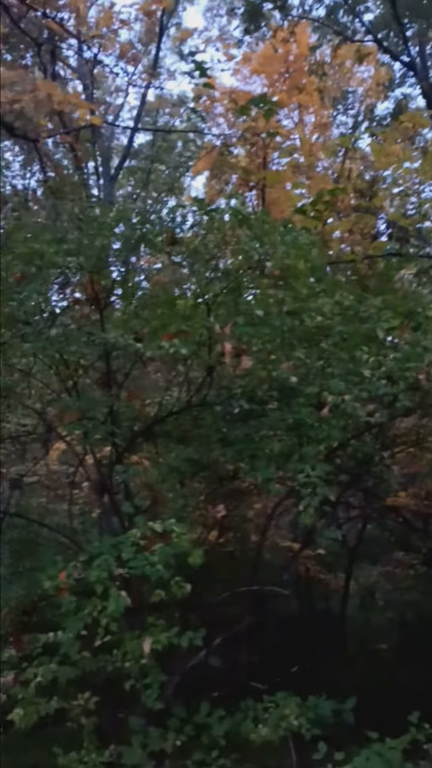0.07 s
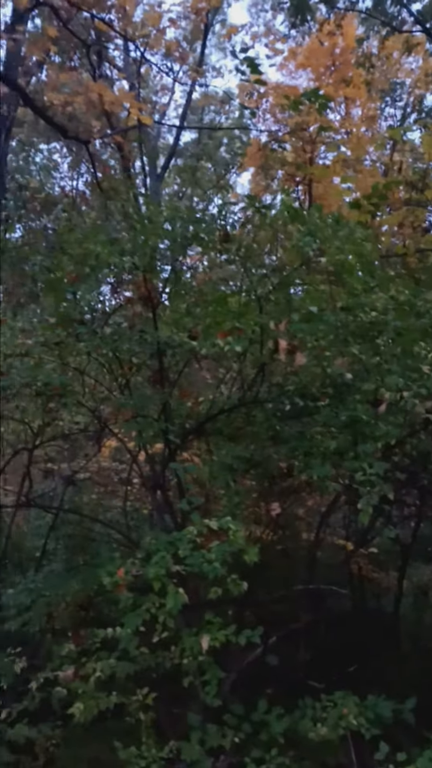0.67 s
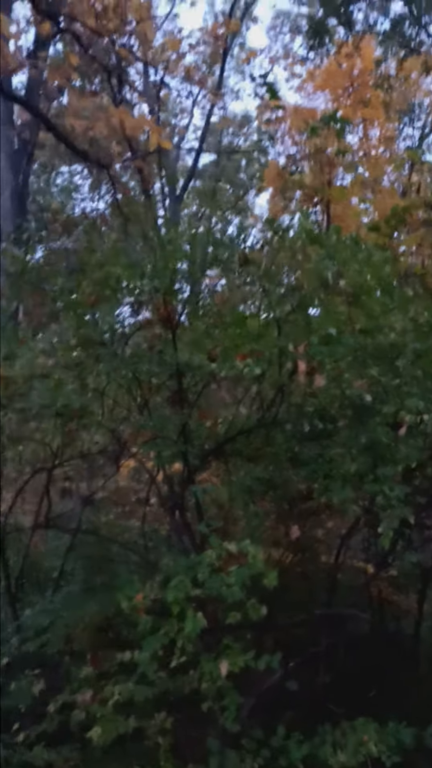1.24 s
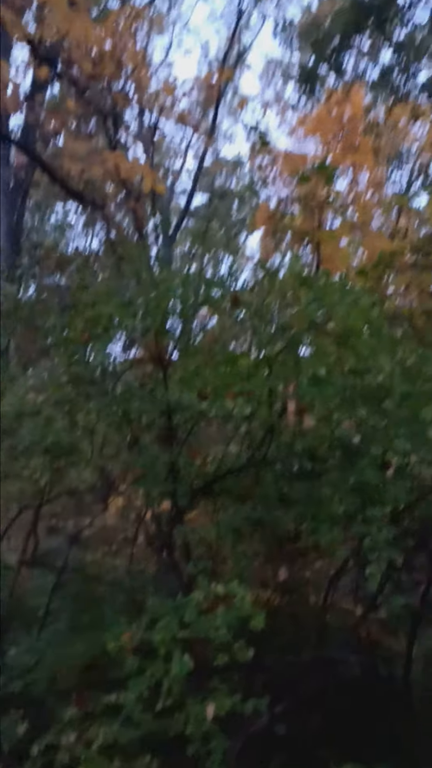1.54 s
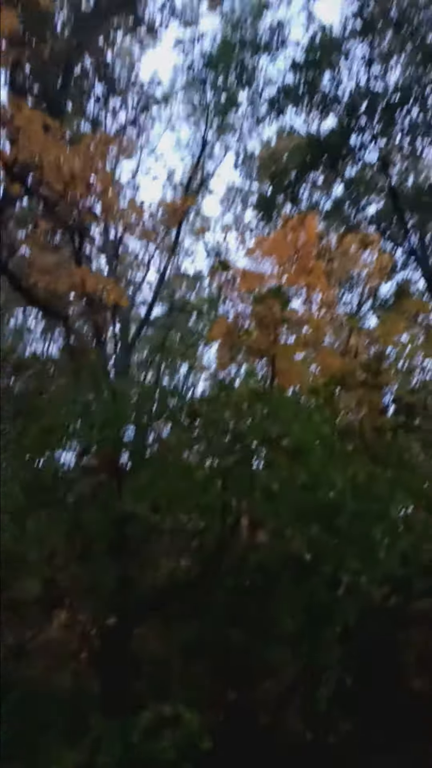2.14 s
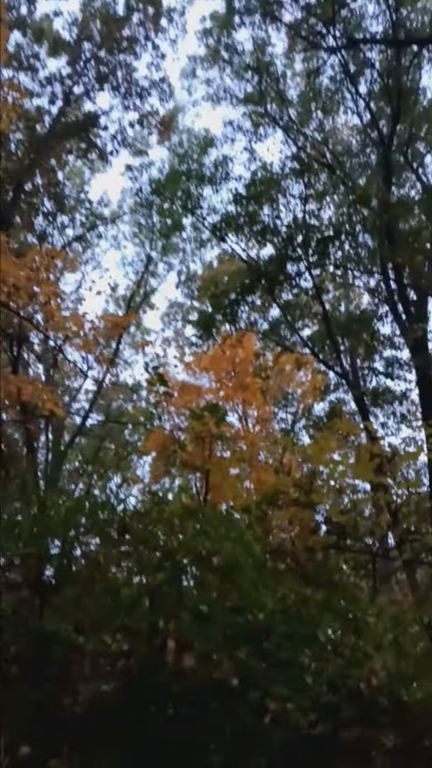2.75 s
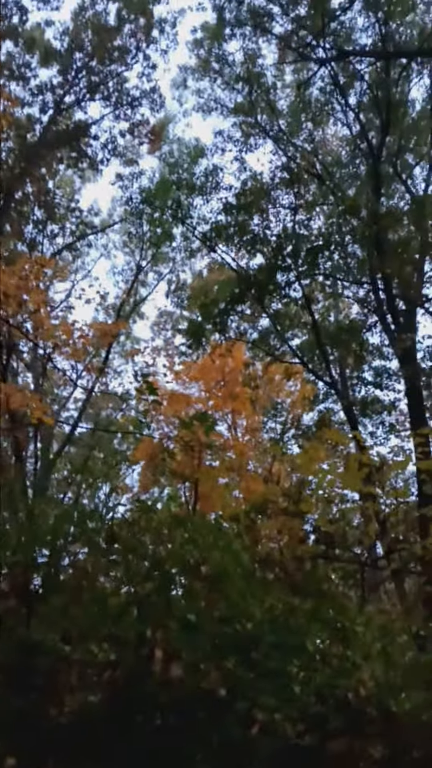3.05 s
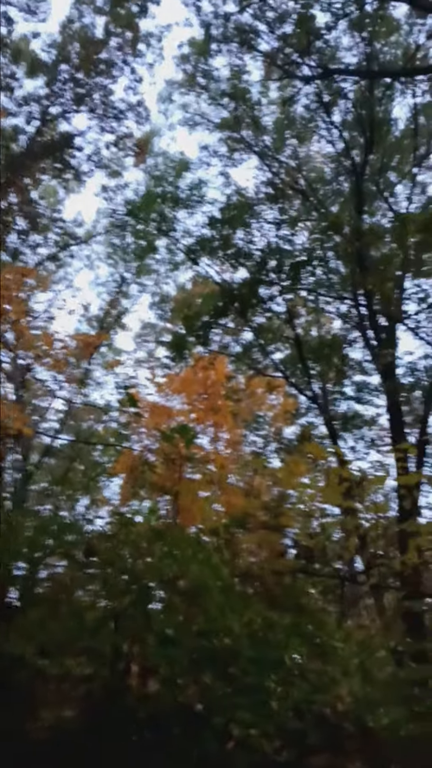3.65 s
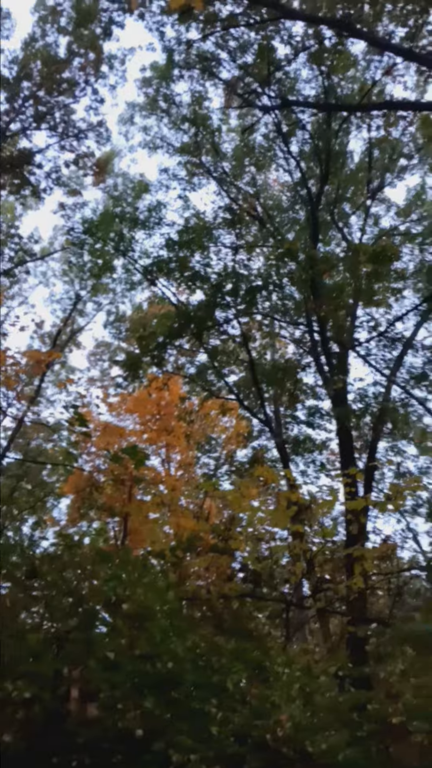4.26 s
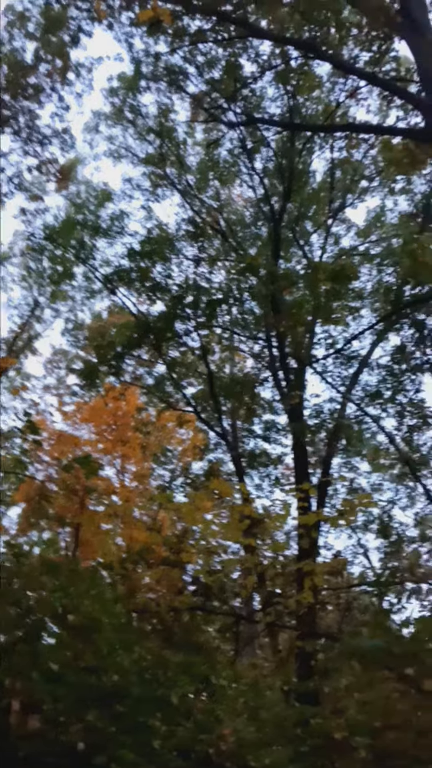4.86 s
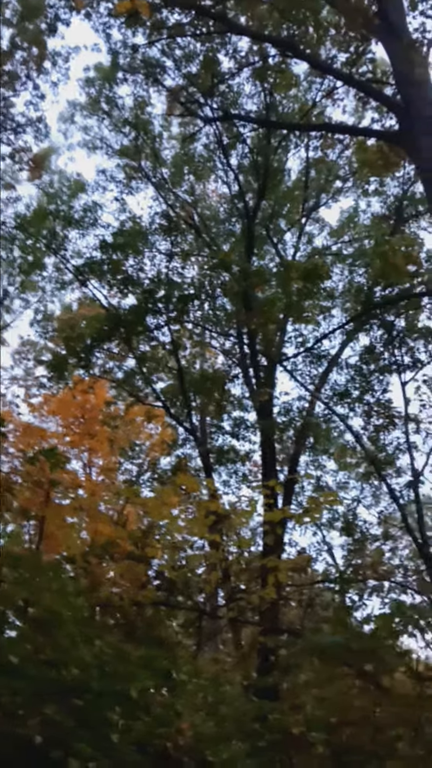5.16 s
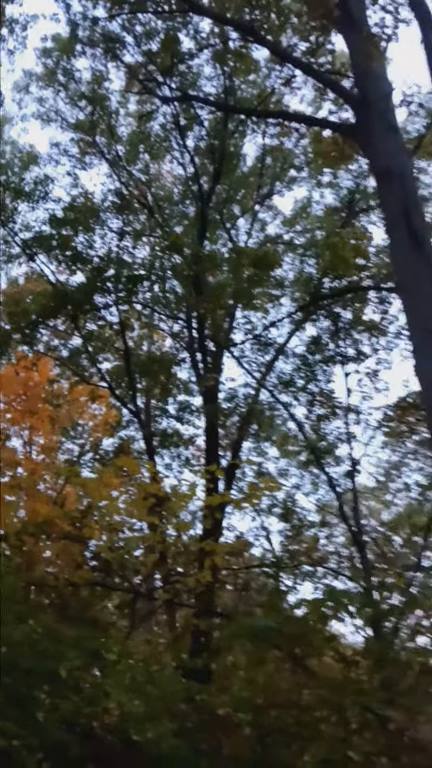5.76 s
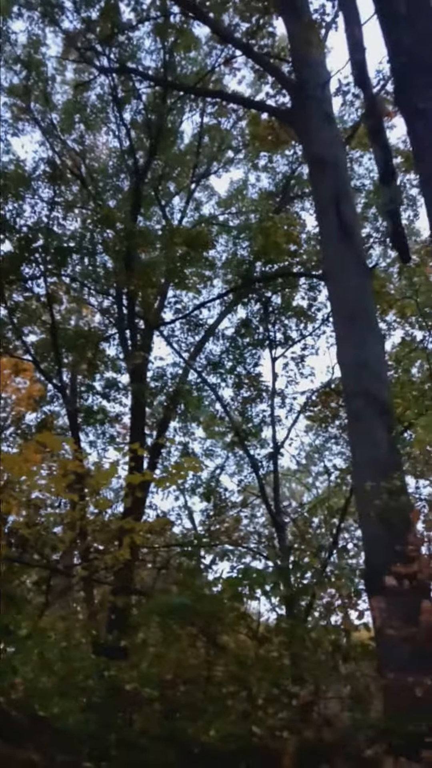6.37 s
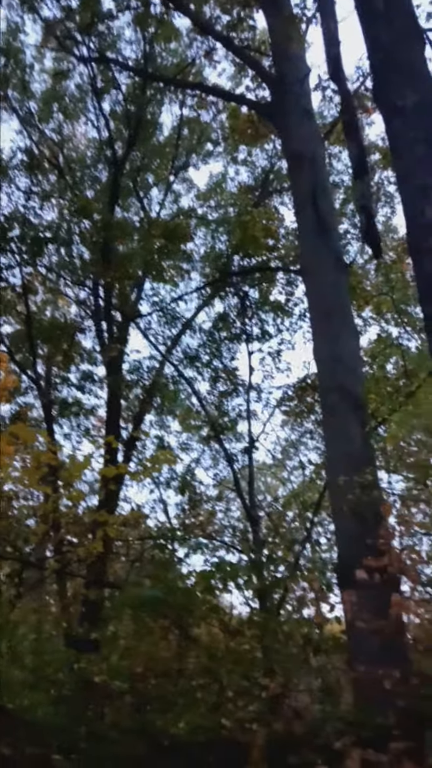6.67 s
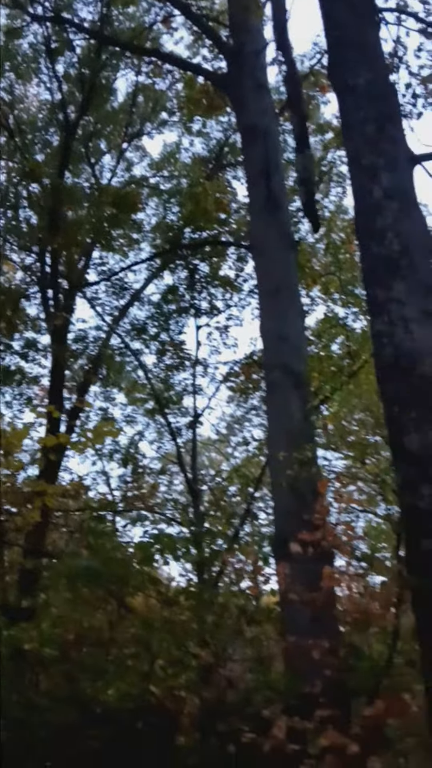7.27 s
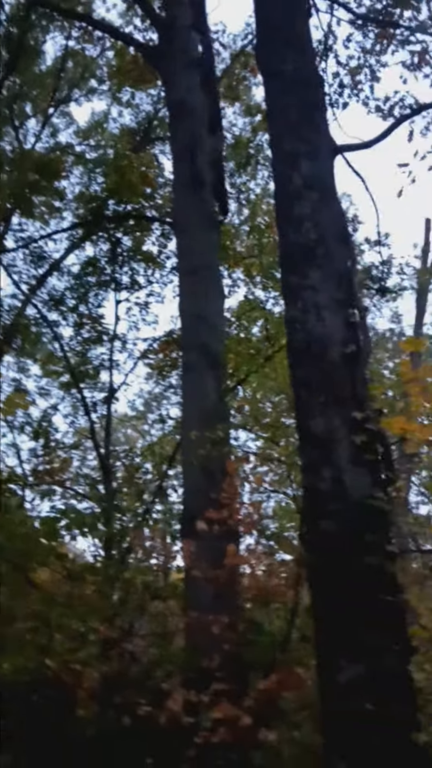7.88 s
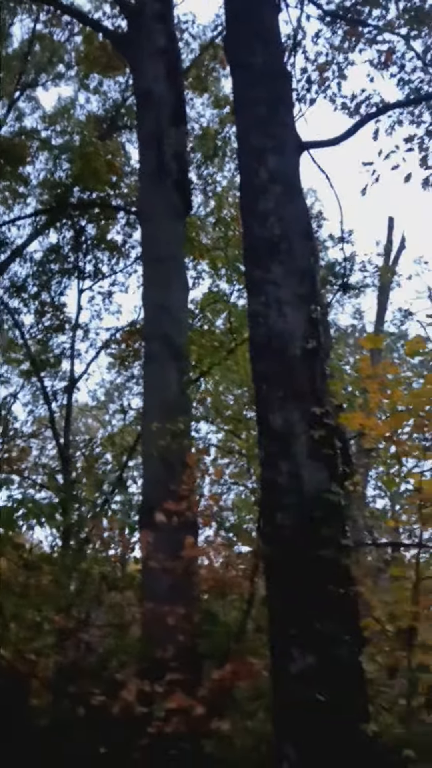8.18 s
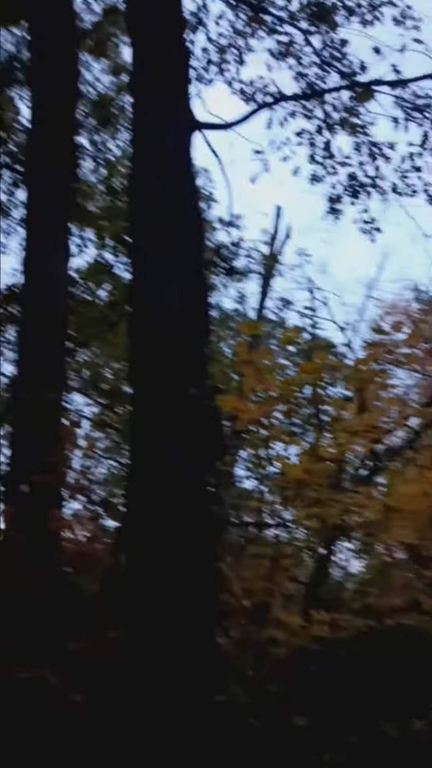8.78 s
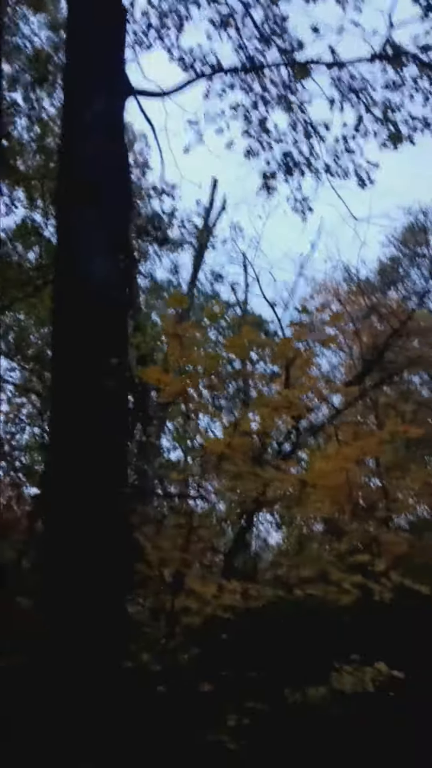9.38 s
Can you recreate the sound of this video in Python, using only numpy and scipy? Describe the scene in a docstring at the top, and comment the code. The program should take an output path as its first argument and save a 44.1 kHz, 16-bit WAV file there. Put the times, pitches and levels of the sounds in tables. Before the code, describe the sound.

Crickets trill throughout in quiet woodland, heard in stereo and leaning left. Nearby ones trade high, pulsing trills, each under half a second, over a throbbing distant chorus. Softer, lower cricket purrs come in the first two seconds and around 6 seconds. Katydids add thin raspy buzzes and strokes, clearest around 2 and 4 seconds. A faint, distant bird gives a hoarse two-note call roughly every 1.2 seconds, over a very soft hiss and far traffic rumble. Small leaf ticks sound at about 1.7 seconds. A twig snaps close on the left just after 6 seconds, and scattered dry clicks follow until about 8.4 seconds. At about 8.8 seconds, dry leaves slide underfoot in a loud, hissing rustle that thins to crackles within about half a second. A few sharp ticks close it around 9.3 to 9.4 seconds as the crickets carry on.

```python
"""Autumn woodland at dusk, on a stereo pair of microphones. Insects scrape wing on wing: bush crickets
trade short trills nearby and merge into a chorus farther off, tree crickets purr lower, ground crickets
trill thin and high, and katydids rasp in the treetops. A far bird calls in pairs of notes over faint
traffic rumble. Close by, dry leaves tick and a twig snaps; near the end someone turns on the spot,
and the leaves slide underfoot in a short loud rustle."""
import sys
import numpy as np
from scipy import signal
from scipy.fft import rfft, irfft
from scipy.io import wavfile
from scipy.ndimage import uniform_filter1d

SR = 44100
rng = np.random.default_rng(int(sys.argv[2]) if len(sys.argv) > 2 else 0)


def generate_wav(signal):
    """Clip the signal to [-1, 1] and save it as 16-bit WAV at the path in sys.argv[1]."""
    frames = np.transpose(np.atleast_2d(signal))
    scaled = np.clip(frames, -1, 1) * 32767
    pcm = np.round(scaled).astype(np.int16)
    wavfile.write(sys.argv[1], SR, pcm)


N = 420713
T = np.arange(N) / SR
HZ = np.maximum(np.fft.rfftfreq(N, 1 / SR), 1)


def from_db(db):
    """Decibels to gain."""
    return 10 ** (np.asarray(db) / 20)


def rms_one(x):
    """Scale to unit power."""
    return x / np.sqrt(np.mean(x ** 2) + 1e-20)


def at_hz(points):
    """Rows of (freq_hz, value) read at every frequency."""
    hz, value = np.transpose(points)
    return np.interp(np.log(HZ), np.log(hz), value)


def panned(pan_db):
    """Microphone gains of constant total power; pan_db is left over right."""
    gains = from_db(np.array([[.5], [-.5]]) * pan_db)
    return gains / np.sqrt(np.mean(gains ** 2, axis=0))


def bell(middle_s, width_s):
    """A smooth rise and fall of height 1; width_s is its standard deviation."""
    return np.exp(-.5 * ((T - middle_s) / width_s) ** 2)


def humps(rows):
    """Sum of bell-shaped rises or dips, in dB."""
    return sum(change_db * bell(middle_s, width_s) for middle_s, width_s, change_db in rows)


def drift(rate_hz):
    """Smooth random wander of spread 1, mostly slower than rate_hz."""
    pole = np.exp(-80 * np.pi * rate_hz / SR)
    noise = rng.standard_normal(N // 40 + 2002)
    slow = signal.lfilter([1], [1, -2 * pole, pole * pole], noise)[2000:]
    return np.interp(np.arange(N) / 40, np.arange(len(slow)), rms_one(slow))


def coloured(x, colour, pan_db):
    """Give a sound a left-right balance and a spectrum that falls away steeply past its ends; rms 1."""
    octaves_outside = np.maximum(np.log2(colour[0][0] / HZ), 0) + np.maximum(np.log2(HZ / colour[-1][0]), 0)
    gain = from_db(at_hz(colour) - 120 * octaves_outside)
    return rms_one(irfft(rfft(x) * gain * panned(pan_db), N))


def grains(per_s, spread_db):
    """Random tiny impacts of unequal size, in stereo."""
    sizes = from_db(spread_db * np.minimum(rng.exponential(1, N), 5))
    return rms_one((rng.random(N) < per_s / SR) * sizes * rng.standard_normal((2, N)))


def mottled(x, depth_db, size):
    """Brief random resonances come and go all over the spectrum; rms 1."""
    frames = signal.stft(x, nperseg=size)[2]
    patches = uniform_filter1d(rng.standard_normal(frames.shape), size=3, axis=-2)
    patches = rms_one(uniform_filter1d(patches, size=5, axis=-1))
    return rms_one(signal.istft(frames * from_db(depth_db * patches), nperseg=size)[1][..., :N])


def woodland(x, wet_db, t60_s=.45):
    """The direct sound and its scatter from trunks and leaves, which shifts as the microphones move."""
    t = T[:SR // 2]
    scatter = rng.standard_normal((2, 2, len(t))) * from_db(-60 * t / t60_s) * (t > .003)
    scatter *= from_db(wet_db) / np.sqrt(np.sum(scatter ** 2, axis=2, keepdims=True))
    here, there = (signal.oaconvolve(np.atleast_2d(x), paths, axes=1)[:, :N] for paths in scatter)
    angle = 2 * drift(2.25)
    return (x + np.cos(angle) * here + np.sin(angle) * there) / np.sqrt(1 + from_db(2 * wet_db))


def trill(start_s, length_s, pitch_hz, level_db, per_s, duty, sag, rough, wander=0, rise_s=.032):
    """Each wing closure is a tone pulse that sags in pitch as the scraper slows along the file."""
    out = np.zeros(N)
    span = slice(max(int(start_s * SR), 0), int((start_s + length_s) * SR))
    t = T[span] - start_s
    sway = np.sin(2 * np.pi * (rng.uniform(1, 2) * t + rng.random()))
    strokes = np.cumsum(per_s * (1 + (.03 + wander) * sway)) / SR + rng.random()
    detune, accent_db = rng.standard_normal((1024, 2))[strokes.astype(int) % 1024].T
    along_file = np.minimum(strokes % 1 / duty, 1)
    pitch = pitch_hz * (1 + sag * (.5 - along_file) + rough * detune + wander * sway)
    pulses = np.sin(np.pi * along_file) * from_db(accent_db) * np.sin(2 * np.pi * np.cumsum(pitch) / SR)
    fade = np.clip(np.minimum(t / rise_s, (length_s - t) / .03), 0, 1)
    out[span] = from_db(level_db) * rms_one(pulses * fade)
    return out


# Still air and far traffic: freq_hz, relative_db
AIR_COLOUR = [(20, -19.5), (45, -5.5), (68, 4), (95, -5), (160, -8.5), (350, -18), (800, -20.5),
              (1500, -25.5), (2100, -21), (3300, -25.5), (5800, -35.5), (8500, -21.5), (11500, -35),
              (15800, -35.5)]
# How alike the air is at the two microphones: freq_hz, correlation
AIR_LIKENESS = [(40, 0.98), (130, 0.48), (280, 0.063), (550, -0.77), (1100, 0.34), (4000, -0.26)]
# Balance of the air between the microphones: freq_hz, left_over_right_db
AIR_BALANCE = [(900, 0), (1900, 4.5), (2500, 1), (6500, 14.5), (10000, -3.5)]
# Swells of the far rumble: middle_s, width_s, change_db
TRAFFIC_SWELLS = [(.3, 0.58, 2), (1.48, 0.13, 6), (3.83, 0.092, 7.5), (5.1, 0.46, 5.5)]

def still_air(level_db=-70, rumble_below_hz=140, rest_db=-3.5, lumps_db=2):
    """Far traffic rumble swells under a soft even hiss."""
    mid, side = rfft(rng.standard_normal((2, N)))
    alike = np.clip(at_hz(AIR_LIKENESS), -1, 1)
    pair = irfft(np.sqrt(1 + alike) * mid + np.sqrt(1 - alike) * side * [[1], [-1]], N)
    air = coloured(pair, AIR_COLOUR, at_hz(AIR_BALANCE))
    rumble = irfft(rfft(air) / (1 + (HZ / rumble_below_hz) ** 4), N)
    swell = from_db(rest_db + humps(TRAFFIC_SWELLS) - lumps_db * drift(6.1))
    return from_db(level_db) * (air + rumble * (swell - 1))


# Tree crickets off among the trunks: start_s, length_s, pitch_hz, level_db, pulses_per_s
TREE_PURRS = [(-.2, 0.35, 2677, -71, 49), (0.2, 0.44, 2446, -81, 30), (0.369, 1.535, 2554, -66.5, 53),
              (4.672, 1.4, 2460, -83.5, 34), (5.616, 0.68, 2707, -74.5, 53), (6.295, 0.37, 2682, -70.5, 45)]

def tree_crickets():
    """Wings purr on a soft low tone that builds over the first fifth of each call."""
    purrs = sum(trill(*row, duty=.8, sag=.022, rough=.007, rise_s=.19 * row[1]) for row in TREE_PURRS)
    return woodland(purrs, wet_db=4, t60_s=.25) * panned(5.7)


# Bush crickets near the microphones: start_s, length_s, pitch_hz, level_db, pan_db
NEAR_TRILLS = [(-0.15, 0.3, 4440, -48, 11), (0.166, 0.31, 4516, -54.5, 5), (0.165, 0.37, 4100, -55.5, 7),
               (0.325, 0.41, 4730, -59, 23), (0.81, 0.4, 4420, -49, 9), (0.922, 0.086, 4450, -43, 8),
               (0.915, 0.38, 3900, -68.5, 13), (1.179, 0.38, 4560, -60, 5), (2.04, 0.38, 4140, -60.5, 10),
               (2.077, 0.29, 4670, -54.5, 2), (2.5, 0.37, 4486, -56, 3), (2.754, 0.37, 4110, -60, 3),
               (2.93, 0.33, 3890, -63.5, 6), (2.973, 0.37, 4710, -59.5, 6), (3.117, 0.38, 4195, -58, 6),
               (3.471, 0.4, 4440, -51.5, -3), (3.978, 0.3, 4040, -60, 12), (4.037, 0.39, 4394, -50, 4),
               (4.284, 0.35, 4717, -54.5, 5), (4.371, 0.25, 4540, -51, 13), (4.621, 0.45, 4450, -51, 9),
               (4.713, 0.31, 4120, -60.5, 23), (4.982, 0.43, 4190, -57, 23),
               (5.069, 0.55, 4430, -53.5, 0.5), (5.091, 0.35, 4600, -52.5, 14), (5.768, 0.35, 4040, -62, 6),
               (5.769, 0.36, 3870, -68, 12), (5.88, 0.29, 4500, -51, 3), (6.308, 0.29, 4158, -54, 0),
               (6.362, 0.35, 4720, -57.5, 5), (6.828, 0.415, 4480, -54.5, -5.5),
               (7.162, 0.24, 3920, -63.5, 16), (7.613, 0.073, 4410, -50, 3), (7.512, 0.79, 4435, -55, -1),
               (7.519, 0.41, 4090, -56, 10), (7.601, 0.54, 4348, -49.5, 8), (7.631, 0.8, 4740, -59.5, 8),
               (7.959, 0.45, 4114, -56.5, 10), (8.138, 0.37, 4540, -49, 20), (9.248, 0.38, 4170, -53.5, 4),
               (9.295, 0.35, 4380, -50.5, 5)]

def bush_crickets(pulses_per_s=44):
    """Near callers take turns, each at its own pitch, pulse rate and side; trees draw the pulses out."""
    calls = 0
    for *call, pan_db in NEAR_TRILLS:
        per_s = pulses_per_s + rng.normal(0, 2)
        calls += panned(pan_db) * trill(*call, per_s, duty=.5027, sag=.01614, rough=.00305, wander=.00202)
    return woodland(calls, wet_db=2, t60_s=.22)


# Bush crickets deeper in the wood, lowest voice first: pitch_hz, level_db
CHORUS_VOICES = [(4190, -59), (4370, -59.5), (4470, -55), (4570, -59), (4740, -71), (5000, -82.5)]
# Rests of the lowest voice: middle_s, width_s, change_db
LOW_VOICE_RESTS = [(2.62, 0.044, -20), (5.58, .13, -9), (7.3, 0.25, -8)]
# Lulls of the whole chorus: middle_s, width_s, change_db
CHORUS_LULLS = [(1.85, 0.26, -4.5), (5.72, 0.11, -3.5), (8.69, 0.085, -9)]

def far_chorus(pulses_per_s=44):
    """Distant trills, wandering in pitch and pace, overlap into one throbbing band."""
    low, *others = (trill(0, N / SR, pitch_hz, level_db, pulses_per_s + rng.normal(0, 3),
                          duty=.45, sag=.03, rough=.007, wander=.008)
                    for pitch_hz, level_db in CHORUS_VOICES)
    callers = low * from_db(humps(LOW_VOICE_RESTS)) + sum(others)
    return woodland(callers * from_db(humps(CHORUS_LULLS)), wet_db=3, t60_s=.25) * panned(6)


# Small crickets on the woodland floor: start_s, length_s, pitch_hz, level_db, pulses_per_s
GROUND_TRILLS = [(0, 8.3, 6820, -83, 70), (0.759, 0.71, 9000, -85, 58), (2.719, 1, 8300, -89, 70),
                 (4.49, 1.3, 9000, -89, 100), (6.785, 0.39, 9020, -78.5, 82)]

def ground_crickets():
    """Thin high wing trills reach the microphones mostly as scatter."""
    threads = sum(trill(*row, duty=.65, sag=.043, rough=.0065) for row in GROUND_TRILLS)
    return woodland(threads, wet_db=11.5) * panned(1.4)


# Katydid wing resonance, shifted down or up for each voice: freq_hz, relative_db
WING_COLOUR = [(6300, -47), (7040, -17.5), (7780, -2), (8610, 2.5), (9630, -1.5), (11000, -10.5),
               (12200, -35), (13500, -38)]
# The two microphones colour the rasp differently, left stronger near 8 kHz, right above 9 kHz:
# freq_hz, left_over_right_db
RASP_MIC_BALANCE = [(8300, 9.5), (9200, -6), (10000, -11.5)]
# Swells of buzzing: middle_s, width_s, relative_db
BUZZ_SWELLS = [(0.02, .11, -71), (.45, 0.18, -69), (1.91, 0.2, -61), (3.84, 0.23, -58.5),
               (5.571, 0.12, -62.5), (8.33, 0.05, -62)]
# Runs of separate wing strokes: start_s, length_s, first_db, growth_db_per_stroke, period_s, width_s
STROKE_RUNS = [(0.114, .53, -66.5, 1.5, 0.091, 0.032), (1.616, 1.0, -67.5, 0.63, 0.098, 0.045),
               (3.667, .67, -57.5, -0.7, 0.095, .029), (5.898, .56, -68.5, 0.67, 0.0862, 0.018),
               (7.788, .46, -75.5, 1.1, 0.084, 0.026), (8.656, .13, -56.5, -1, 0.081, .018)]

def katydids(gain_db=.5, flutter_hz=32, uneven_db=.6):
    """File teeth set the wings ringing overhead: a lower voice buzzes, a higher one lisps in strokes."""
    flutter = 1 + .092 * np.sin(2 * np.pi * flutter_hz * T)
    buzz = flutter * sum(from_db(db) * bell(middle_s, width_s) for middle_s, width_s, db in BUZZ_SWELLS)
    lisps = sum(from_db(first_db + k * growth_db) * bell(middle_s, width_s)
                for start_s, length_s, first_db, growth_db, period_s, width_s in STROKE_RUNS
                for k, middle_s in enumerate(np.arange(start_s, start_s + length_s, period_s)))
    out = 0
    for effort, pitch_ratio in ((buzz, .965), (lisps, 1.028)):
        teeth = mottled(grains(per_s=3000, spread_db=0), depth_db=5, size=512)
        rasp = coloured(teeth, np.array(WING_COLOUR) * [pitch_ratio, 1], at_hz(RASP_MIC_BALANCE))
        out += effort * from_db(gain_db + uneven_db * drift(28)) * rasp
    return woodland(out, wet_db=-7, t60_s=.3)


def far_leaf_ticks(level_db=-87.5, per_s=18):
    """Leaves farther off tick at random, each with its own ring."""
    ticks = mottled(grains(per_s, spread_db=.5), depth_db=6, size=256)
    ticks = coloured(ticks, [(3000, -12), (6000, 0), (12000, -16)], pan_db=4)
    return from_db(level_db) * woodland(ticks, wet_db=0, t60_s=.08)


# A bird far off to the left, two notes to a call: first_note_s, level_db
BIRD_CALLS = [(.79, -68), (1.95, -71.5), (3.24, -68), (4.35, -71.5), (5.62, -71), (6.785, -68.5),
              (8.085, -62)]

def far_bird(pitch_hz=2060, gap_s=.218, width_s=.028, arch=.028, fall=.02, upper_db=-6):
    """Hoarse notes that arch and fall, with a weaker upper partial, blurred by distance."""
    out, hoarse = np.zeros(N), .05 * drift(250)
    for first_note_s, level_db in BIRD_CALLS:
        for middle_s in (first_note_s, first_note_s + gap_s):
            span = np.abs(T - middle_s) < .2
            along = (T[span] - middle_s) / width_s
            bend = 1 - arch * np.minimum(along ** 2, 3) - fall * along
            phase = 2 * np.pi * np.cumsum(pitch_hz * (bend + hoarse[span] + rng.normal(0, .01))) / SR
            tone = np.sin(phase) + from_db(upper_db) * np.sin(1.4 * phase)
            out[span] += from_db(level_db) * np.exp(-.5 * along ** 2) * tone
    return woodland(out, wet_db=6) * panned(9)


def handling_bump(middle_s=1.383, level_db=-68, width_s=.045):
    """A hand shifts its grip: one dull puff at the microphones."""
    puff = coloured(rng.standard_normal((2, N)), [(120, -3), (400, -3), (600, -27)], pan_db=0)
    return from_db(level_db) * bell(middle_s, width_s) * puff


# Midrange colour of close sounds, with the microphone's resonances near 1.8 and 3.2 kHz:
# freq_hz, relative_db
CLOSE_MIDRANGE = [(150, -41), (290, -21), (430, -10.5), (800, -5.5), (1450, -5.5), (1830, 4), (2400, -4),
                  (3250, 4), (3700, 0.5), (4300, -10.5)]
# Close ticks on the left, dry leaves and one thin high katydid tick (8.129 s):
# start_s, strength_db, relative_knock_db, relative_crack_db, ring_hz
CLOSE_TICKS = [(1.598, -58, -10, -2, 6500), (1.721, -50.5, -7, -5, 6200), (6.15, -40.5, -6.5, -6.5, 6800),
               (6.718, -39, -15.5, -41, 5420), (6.787, -42.5, -22, -8, 3350),
               (6.817, -44.5, -24, -28, 8500), (6.895, -53, -20, -7, 3420), (7.415, -54, -4, -9, 5840),
               (7.797, -49, 0.5, 0, 6200), (8.129, -35, -21, -20, 8500), (8.358, -42.5, 0, -35, 3380),
               (9.312, -32, -3, -12, 3230), (9.35, -32.5, -11, -10, 6040), (9.388, -36.5, -9, -16, 5600),
               (9.431, -40, -29, -25, 7300)]

def close_ticks(snap_s=.0013, tail_s=.018, tail_db=-19, ring_q=4.5, pan_db=11):
    """Each tick, of a dry leaf or a katydid, snaps, rings at its own pitch and crackles briefly."""
    out = np.zeros((2, N))
    body = coloured(rng.standard_normal((2, N)), CLOSE_MIDRANGE, pan_db=0)
    crackle = grains(per_s=1500, spread_db=2)
    crack_band = signal.butter(1, [4500, 10500], "band", fs=SR)
    for start_s, strength_db, knock_db, crack_db, ring_hz in CLOSE_TICKS:
        span = slice(int(start_s * SR), int(start_s * SR) + SR // 8)
        age = T[span] - T[span][0]
        snap = age / snap_s * np.exp(1 - age / snap_s)
        tail = from_db(tail_db) * np.exp(-age / tail_s)
        push = snap * rng.standard_normal((2, len(age))) + tail * crackle[:, span]
        resonance = signal.iirpeak(ring_hz, ring_q, fs=SR)
        ring = 2 * signal.lfilter(*resonance, signal.lfilter(*resonance, push))
        # a bright crack comes with the snap, and a stiffer leaf adds a knock
        crack = from_db(crack_db) * signal.lfilter(*crack_band, push)
        knock = from_db(knock_db - 11) * (snap + 2 * tail) * body[:, span]
        out[:, span] += from_db(strength_db) * (ring + knock + crack)
    return out * panned(pan_db)


# The hiss of leaf on leaf, shared by stirs and rustle: freq_hz, relative_db
LEAF_HISS = [(2120, -57), (3600, -22.5), (4410, -2), (5120, -2), (6550, 0), (7400, -3), (9850, -5),
             (11500, -15), (15800, -14.5)]
# Stirs in the litter nearby: middle_s, width_s, level_db, relative_hiss_db, pan_db
LITTER_STIRS = [(2.851, 0.086, -74, -1, 2), (6.781, 0.062, -76, 7, 9.5), (8.358, 0.021, -61.5, 2, 16),
                (8.79, 0.15, -69, 4, 9)]

def leaf_stirs():
    """Leaf litter shifts in short soft crinkles."""
    crinkle = mottled(grains(per_s=1200, spread_db=0), depth_db=4, size=256)
    body, hiss = coloured(crinkle, CLOSE_MIDRANGE, pan_db=0), coloured(crinkle, LEAF_HISS, pan_db=0)
    return sum(from_db(level_db) * bell(middle_s, width_s) * (body + from_db(hiss_db) * hiss) * panned(pan_db)
               for middle_s, width_s, level_db, hiss_db, pan_db in LITTER_STIRS)


def twig_snap(start_s=6.152, pan_db=11):
    """A twig breaks close on the left; the wood rings briefly on two notes, the lower one longer."""
    age = np.maximum(T - start_s, 0)

    def mode(pitch_hz, level_db, t60_s):
        return from_db(level_db - np.minimum(60 * age / t60_s, 150)) * np.sin(2 * np.pi * pitch_hz * age)

    return panned(pan_db) * (mode(780, -66.5, .062) + mode(2840, -48, .013))


# The leaves slip and catch again underfoot: middle_s, width_s, change_db
RUSTLE_SLIPS = [(8.87, 0.0099, -3), (9.04, 0.011, -2), (9.095, .01, 2), (9.125, 0.0073, -4),
                (9.44, 0.032, -4)]

def rustle_effort(age, attack_s=.16, hold_s=.12, release_s=.4, build_db=17, fall_db=22.5):
    """Strength of the sliding contact in dB: attack, hold, a release that steepens, then a faint rest."""
    build = np.clip(age / attack_s, 0, 1)
    fall = np.clip((age - attack_s - hold_s) / release_s, 0, 1.06)
    return build_db * (build - 1) - fall_db * fall ** 1.9 + humps(RUSTLE_SLIPS)


# Balance of the close rustle, mostly stronger in the left microphone: freq_hz, left_over_right_db
RUSTLE_BALANCE = [(900, 2), (1800, 11.5), (2450, 2.5), (3200, 12.5), (4400, 6), (6500, 12.5), (8200, 10),
                  (9400, 2), (10500, -7), (15000, 13)]

def rustle(start_s=8.768, catch_s=.022, hiss_db=-32.5, body_db=-39, body_lag_s=.0039, left_lag_s=.00048):
    """Sliding contact: dense friction grains at full speed, thinning to sparser crackles as it slows."""
    age = T - start_s
    effort_db = rustle_effort(age)
    per_s = 700 + 16000 * from_db(effort_db) ** 1.5
    direct, scattered = grains(per_s, spread_db=2.4)[0], grains(per_s, spread_db=2)
    # the direct sound reaches the left microphone a little later
    pair = np.array([np.roll(direct, round(left_lag_s * SR)), direct])
    friction = woodland((pair + scattered) / np.sqrt(per_s), wet_db=-8, t60_s=.03)
    friction = mottled(friction, depth_db=2, size=160)
    body_effort_db = .87 * np.interp(T - body_lag_s, T, effort_db)
    hiss = coloured(friction, LEAF_HISS, at_hz(RUSTLE_BALANCE)) * from_db(hiss_db + effort_db)
    body = coloured(friction, CLOSE_MIDRANGE, at_hz(RUSTLE_BALANCE)) * from_db(body_db + body_effort_db)
    return (hiss + body) * np.clip(age / catch_s, 0, 1)


def scene():
    """Insects all round, a bird far off, small noises close to the microphones."""
    insects = bush_crickets() + far_chorus() + tree_crickets() + ground_crickets() + katydids()
    small_noises = close_ticks() + twig_snap() + leaf_stirs() + far_leaf_ticks()
    return insects + small_noises + far_bird() + rustle() + handling_bump() + still_air()


def record(dry):
    """The top is cut steeply above 15.8 kHz."""
    return signal.sosfilt(signal.ellip(12, .1, 80, 15800, fs=SR, output="sos"), dry)


dry = scene()
out = record(dry)
generate_wav(out)
```